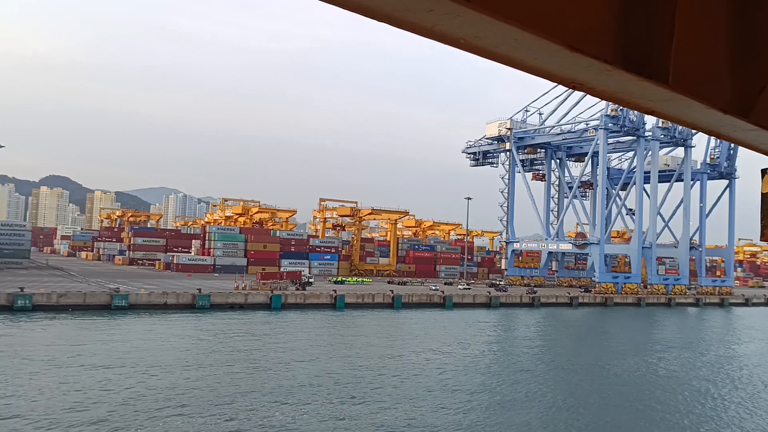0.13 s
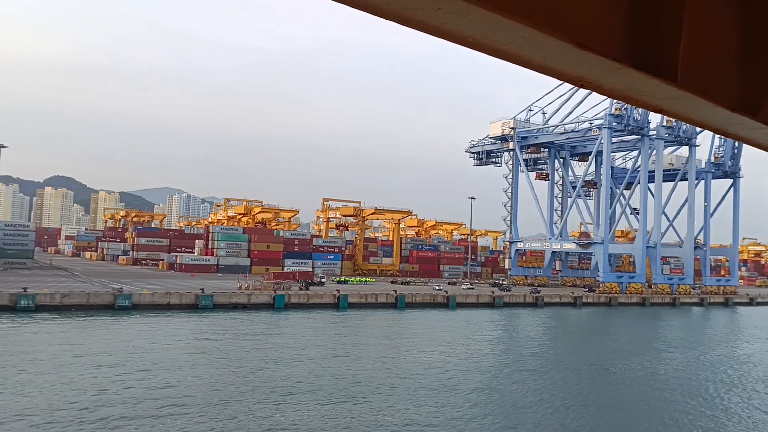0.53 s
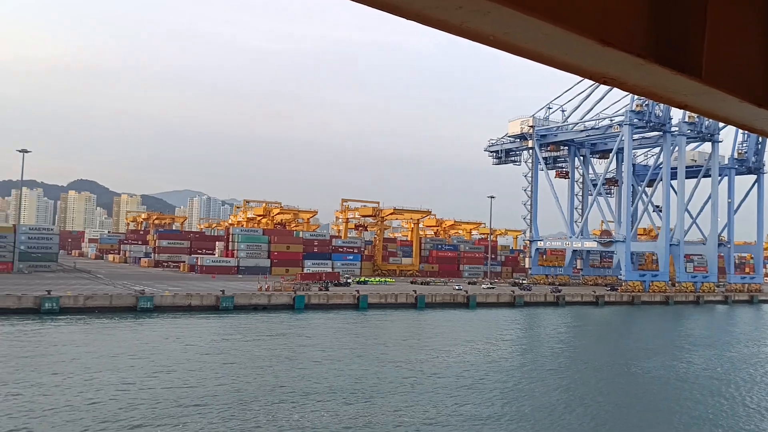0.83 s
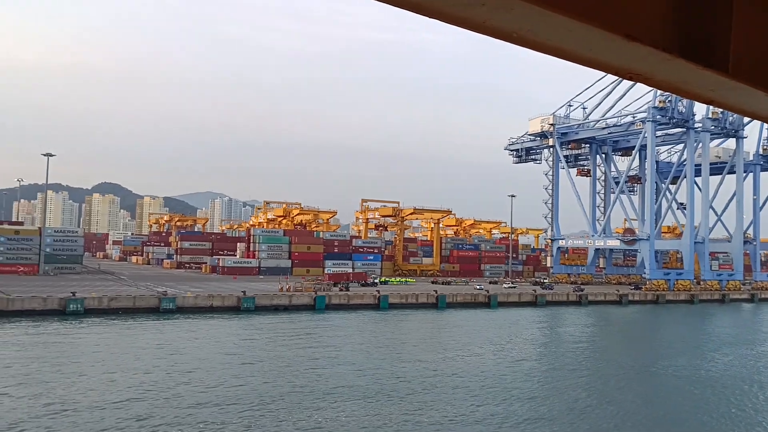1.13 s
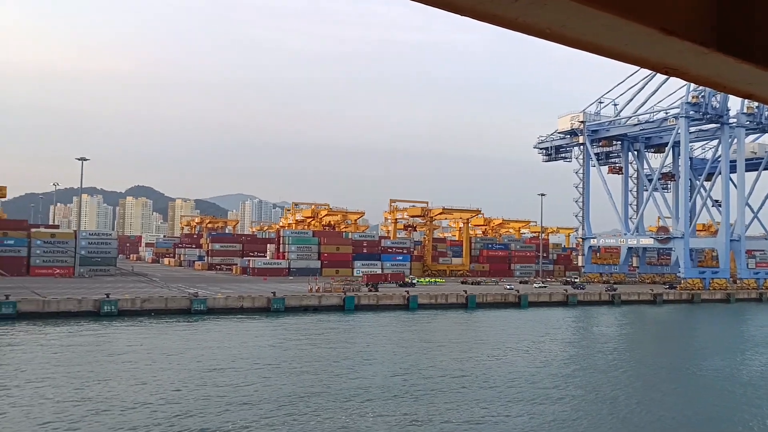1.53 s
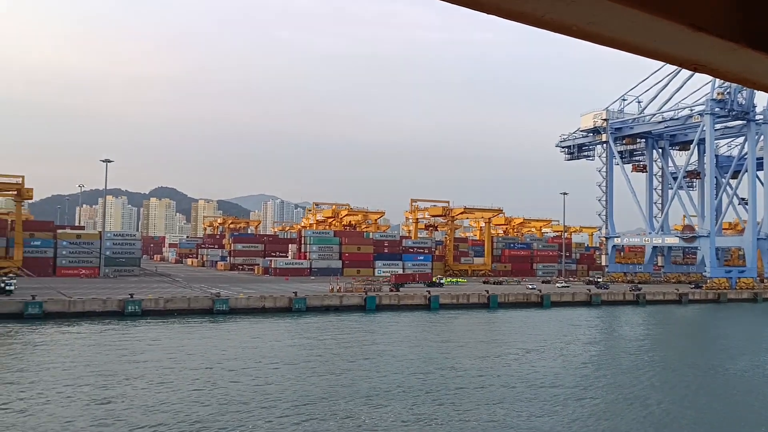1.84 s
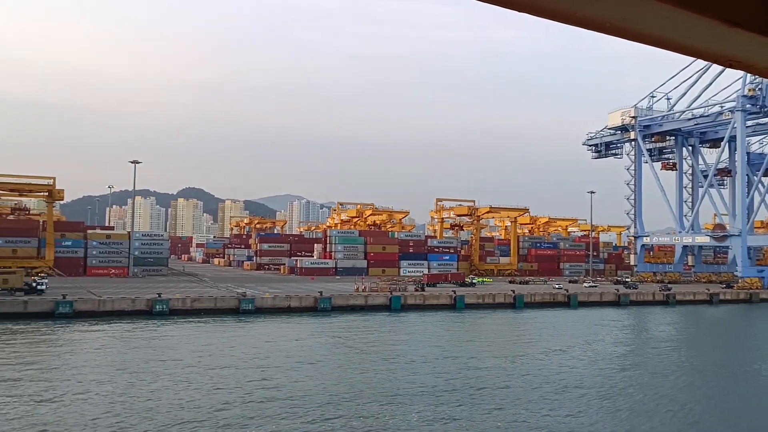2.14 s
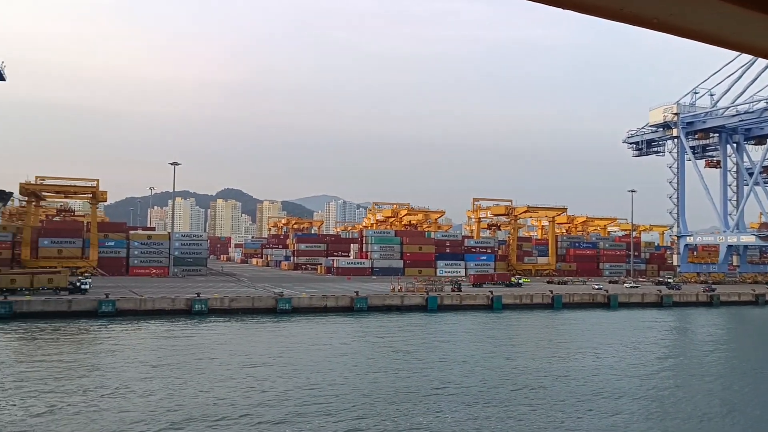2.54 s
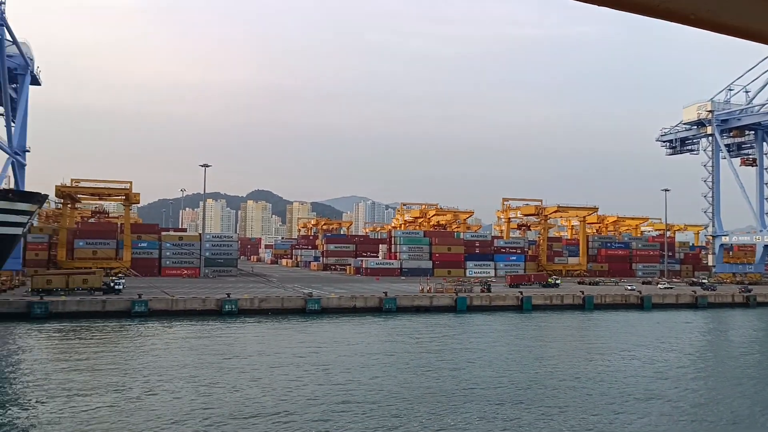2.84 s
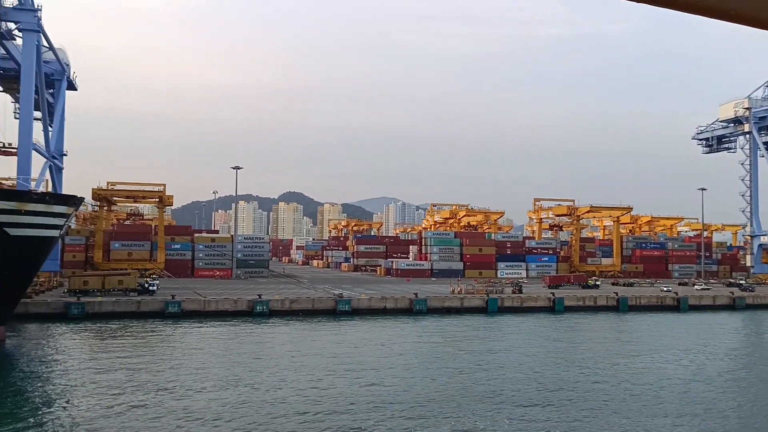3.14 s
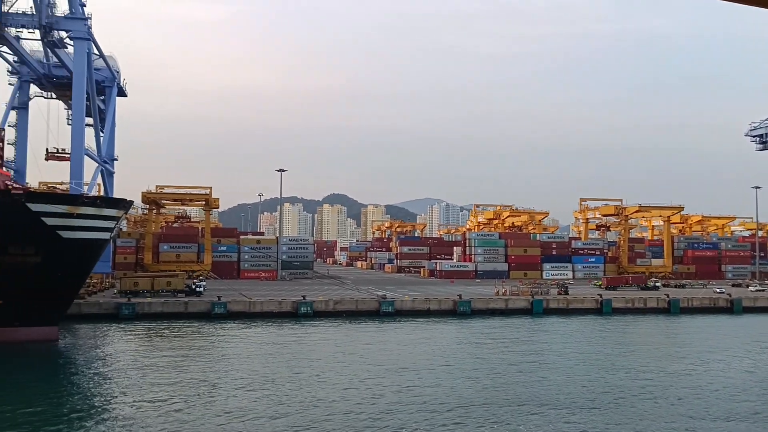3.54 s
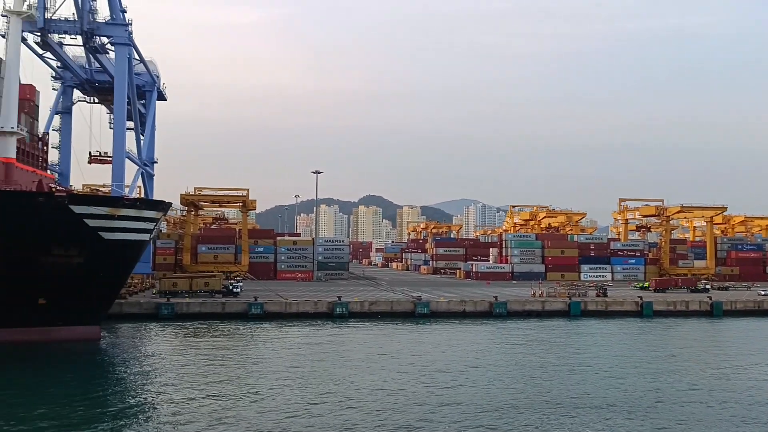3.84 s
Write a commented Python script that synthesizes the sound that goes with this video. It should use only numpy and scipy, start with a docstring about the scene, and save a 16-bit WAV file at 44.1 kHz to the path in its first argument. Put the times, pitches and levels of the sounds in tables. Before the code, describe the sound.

A ship's diesel engine fades in over the first half second and throbs low and steady until the end at 4 seconds, heard on deck. Ventilation rushes throughout, with thin fan tones, a narrow hiss and a faint, very high electrical tone. A blower whine swells and fades between the ears, strongest around 1.7 and 3.8 seconds. Two very soft ticks sound nearby at about 1 and 2.5 seconds.

```python
"""A ship's six-cylinder diesel engine throbs through the steelwork, heard on the open deck in harbour.
Its cylinders fire with uneven strength, which makes the throb. Ventilation rushes, with thin fan tones
and a narrow hiss. A blower's whine swells and fades at each ear as the listener turns through its
standing waves (loud and quiet spots in the air). An inverter sings faintly, very high, and two soft
ticks sound close by. Everything fades in at the start."""
import sys
import numpy as np
from scipy import signal
from scipy.fft import rfft, irfft
from scipy.io import wavfile

SR = 44100
rng = np.random.default_rng(int(sys.argv[2]) if len(sys.argv) > 2 else 0)


def transcribe(u):
    """Save the signal u as a 16-bit wav file named by the first command-line argument.

    u: samples, shape (n,) or (channels, n), limited to [-1, 1]; the rate is SR.
    q: integer samples, one column per channel.
    """
    v = np.clip(np.atleast_2d(u).T, -1, 1)
    q = np.round(v * 32767).astype(np.int16)
    wavfile.write(sys.argv[1], SR, q)


N = 176400
T = np.arange(N) / SR

# rush of air and exhaust: (pitch [Hz], left level [dB per Hz], right level [dB per Hz])
RUSH_SPECTRUM = [(25, -84, -84), (54.3, -75, -74.5), (77, -61, -58.5), (115, -53, -53.5), (200, -50, -50),
                 (308, -55, -54), (412, -56.5, -56.5), (560, -62, -62), (690, -59.5, -60),
                 (1050, -64.5, -63), (1540, -69, -65.5), (2050, -70, -64.5), (2580, -72.5, -64),
                 (3050, -77, -70), (3890, -77.5, -77.5), (4720, -84, -88), (6400, -92.5, -90.5),
                 (8000, -92.5, -100), (9100, -100, -107), (11100, -109, -112), (15000, -112, -113)]
# how alike the rush is at the two ears: (pitch [Hz], likeness [-1 to 1])
RUSH_LIKENESS = [(60, 0.93), (170, 0.97), (280, 0.93), (450, 0.88), (740, 0.58), (1220, 0.17),
                 (2000, 0.042), (3300, 0.16), (15000, 0.042)]
# swell of the narrow hiss: (time [s], level [dB])
HISS_LEVELS = [(.4, -57.5), (.7, -58.5), (.95, -54), (1.3, -53), (1.65, -55.5), (2.05, -51.5),
               (2.45, -50.5), (2.9, -55.5), (3.2, -53), (3.6, -53.5), (4, -55.5)]
# faint ticks close by: (time [s], level [dB])
TICK_EVENTS = [(1.013, -55), (2.519, -58)]
# inverter switching tones: (pitch [Hz], left level [dB], right level [dB], pitch wander [Hz])
INVERTER_PITCHES = [(9680, -77, -84, 1), (9958, -82, -87, 1), (10000, -76, -81, 1), (10042, -78, -85, 1),
                    (10320, -77, -83, 1), (10362, -86, -89, 1)]
# fan and motor tones: (pitch [Hz], left level [dB], right level [dB], pitch wander [Hz])
FAN_PITCHES = [(826, -51.5, -51.5, 3), (921.5, -43, -43, .7), (935, -51, -51, 16), (1374, -50, -49, 7),
               (1656, -60, -51.5, 1.2), (2469, -60, -53, 13), (2787, -63, -66, 1.5), (8059, -76, -85, 6)]
# blower whine: (time [s], left level [dB], right level [dB], left ear's head start [ms])
WHINE_AT_EARS = [(0.3, -45, -46, 0.05), (0.4, -35, -36, 0.05), (0.56, -32, -29, 0.01),
                 (0.76, -39, -37, 0.27), (0.86, -30, -28, 0.18), (0.99, -30, -30, 0.17),
                 (1.12, -44, -30.5, 0.3), (1.2, -51, -44, 0.19), (1.36, -44, -45, 0.48),
                 (1.43, -31, -31, 0.56), (1.6, -29, -35, 0.55), (1.69, -26.5, -21.5, 0.65),
                 (1.84, -33, -25, 0.63), (2.02, -30, -35, 0.58), (2.12, -28, -31, 0.33),
                 (2.24, -39, -36, 0.24), (2.5, -31, -37, 0.45), (2.65, -36, -41, 0.42),
                 (2.75, -38, -26.5, 0.44), (2.92, -38, -35, 0.25), (3.09, -38, -27.5, 0.3),
                 (3.15, -45, -45, 0.4), (3.37, -43, -43, 0.35), (3.56, -42, -27, 0.45),
                 (3.68, -33, -26, 0.75), (3.8, -33, -23.5, 0.86), (3.98, -31, -26.5, 0.86)]
# the six firings of one four-stroke engine cycle, in order: (strength [dB])
FIRING_STRENGTHS = [-3.8, -5.6, -10, -1, -.5, -2.2]
# engine hum: (harmonic [multiple of the cycle rate], level [dB])
ENGINE_HARMONICS = [(6, -46), (11, -57), (12, -53.5), (13, -51), (14, -44), (15, -45), (16, -52), (17, -46),
                    (18, -32.5), (19, -45), (20, -38), (21, -50), (22, -55), (23, -32.5), (24, -28.5),
                    (25, -32), (26, -32.5), (27, -36.5), (28, -49), (29, -36), (30, -40), (31, -51),
                    (32, -40), (33, -42), (34, -52), (35, -43), (36, -34), (37, -46), (38, -47), (39, -46),
                    (40, -42), (41, -54), (42, -46.5), (43, -49), (44, -43.5), (45, -48.5), (46, -48.5)]
# ringing of the steelwork, which delays each firing and draws it out: (pitch [Hz], width [Hz])
HULL_RESONANCES = [(149, 24), (225, 80)]
# opening fade, applied to the whole sound: (time [s], gain [dB])
FADE_IN = [(.09, -81), (.105, -52), (.122, -30), (.2, -20.5), (.3, -13), (.38, -6.5), (.5, -3)]


def from_db(db):
    """Turn decibels into a gain to multiply by."""
    return 10 ** (np.asarray(db) / 20)


def unit_level(x):
    """Scale a signal so its average power is 1."""
    return x / np.sqrt(np.mean(x ** 2) + 1e-20)


def over_time(rows):
    """Join a table's time points with straight lines: one curve per value column."""
    times, *columns = np.transpose(rows)
    return [np.interp(T, times, c) for c in columns]


def over_pitch(rows, hz):
    """Read a table's value columns at the pitches hz, with octaves evenly spaced."""
    points, *columns = np.transpose(rows)
    return np.array([np.interp(np.log(hz + 1e-9), np.log(points), c) for c in columns])


def drift(rate_hz):
    """A smooth random wobble with a typical size of 1."""
    pole = np.exp(-200 * np.pi * rate_hz / SR)
    noise = rng.standard_normal(N // 100 + 1002)  # one value per 100 samples, plus a run-up
    slow = signal.lfilter([1], [1, -2 * pole, pole * pole], noise)[1000:]
    return np.interp(np.arange(N) / 100, np.arange(len(slow)), unit_level(slow))


def pan(left_db):
    """Gains that raise the left ear and lower the right."""
    return from_db([[left_db], [-left_db]])


def wandering_phase(hz, wander_hz):
    """The growing angle of a tone whose pitch is not quite steady."""
    return 2 * np.pi * np.cumsum(hz + wander_hz * drift(6.02)) / SR


def air_rush(flicker_db=.5):
    """Broad noise of ventilation and exhaust: alike at both ears in the bass, unlike in the treble."""
    hz = np.arange(N // 2 + 1) * SR / N
    shared, opposite = rfft(rng.standard_normal((2, N)))
    alike = np.clip(over_pitch(RUSH_LIKENESS, hz), -1, 1)
    ears = np.sqrt(1 + alike) * shared + np.sqrt(1 - alike) * opposite * [[1], [-1]]
    air = irfft(ears * from_db(over_pitch(RUSH_SPECTRUM, hz)), N) * np.sqrt(SR) / 2
    return air * from_db(flicker_db * drift(9.1))


def air_hiss(hz=5455, width_hz=250, flicker_db=1.7):
    """A narrow band of air noise, gently surging."""
    band = signal.butter(2, [hz - width_hz / 2, hz + width_hz / 2], "band", fs=SR, output="sos")
    air = unit_level(signal.sosfilt(band, rng.standard_normal((2, N))))
    return air * from_db(over_time(HISS_LEVELS)[0] + flicker_db * drift(7)) * pan(left_db=2.3)


def ticks(decay_s=.048, low_cut_hz=6500):
    """Short, bright bursts of noise that die away."""
    level = sum(from_db(db) * (T >= s) * np.exp(-np.abs(T - s) / decay_s) for s, db in TICK_EVENTS)
    bright = signal.butter(2, low_cut_hz, "high", fs=SR, output="sos")
    return signal.sosfilt(bright, level * rng.standard_normal((2, N)) + 1e-18) * pan(left_db=2.6)


def machine_tones(rows, flicker_db, blur_rad, flicker_hz):
    """Thin tones of fans or an inverter; reflections make each flicker and shift between the ears."""
    ears = np.zeros((2, N))
    for hz, left_db, right_db, wander_hz in rows:
        phase = wandering_phase(hz, wander_hz)
        for ear, db in zip(ears, (left_db, right_db)):
            level = from_db(db + flicker_db * drift(flicker_hz))
            ear += np.sqrt(2) * level * np.sin(phase + blur_rad * drift(flicker_hz))
    return ears


def blower_whine(hz=1893, flicker_db=2.5, octave_db=-32):
    """Spinning blades make a tone and its faint octave; each ear gets its own level and delay."""
    left_db, right_db, lead_ms = over_time(WHINE_AT_EARS)
    phase = wandering_phase(hz, wander_hz=.78)
    half_lead = np.pi * hz * lead_ms / 1000
    ears = []
    for db, angle in (left_db, phase + half_lead), (right_db, phase - half_lead):
        tone = np.sin(angle) + from_db(octave_db) * np.sin(2 * angle)
        ears.append(from_db(db + flicker_db * drift(11.5)) * tone)
    return np.sqrt(2) * np.array(ears)


def diesel_engine(cycle_hz=5.984, first_firing_s=.0196, flutter=.084, flutter_hz=2.8, wander_s=.00008):
    """A stack of tones takes its timing from the uneven firings, so the bass throbs once a cycle."""
    harmonics, levels_db = np.transpose(ENGINE_HARMONICS)
    # above the table, a drone that falls 10.5 dB per octave
    upper = np.arange(round(harmonics[-1]) + 1, 120)
    drone_db = -47.5 - 10.5 * np.log2(upper / upper[0]) + rng.normal(0, 2, len(upper))
    harmonics = np.r_[np.round(harmonics), upper]
    gains = np.sqrt(2) * from_db(np.r_[levels_db, drone_db])
    hz = harmonics * cycle_hz
    cylinders = len(FIRING_STRENGTHS)
    firings_s = first_firing_s + np.arange(cylinders) / cylinders / cycle_hz
    phase = np.angle(np.exp(-2j * np.pi * np.outer(hz, firings_s)) @ from_db(FIRING_STRENGTHS))
    phase -= sum(2 * np.arctan(2 * (hz - ring_hz) / width_hz) for ring_hz, width_hz in HULL_RESONANCES)
    # above 215 Hz, the many paths through the hull smear the firings
    phase += .62 * (hz / 215) ** 4 * rng.standard_normal(len(hz))
    ear_shift = hz / 740 * rng.standard_normal(len(hz)) / 2  # ears about a radian apart at 740 Hz
    # build one cycle for each ear, then loop it at a slightly unsteady speed
    cycle = np.linspace(0, 1, 4096)
    angles = 2 * np.pi * np.outer(harmonics, cycle)
    waves = [gains @ np.cos(angles + ear[:, None]) for ear in (phase + ear_shift, phase - ear_shift)]
    position = (T + wander_s * drift(flutter_hz)) * cycle_hz % 1
    hum = np.array([np.interp(position, cycle, wave) for wave in waves])
    return hum * (1 + flutter * drift(flutter_hz))


def scene():
    """All the machinery together, as heard on deck."""
    fans = machine_tones(FAN_PITCHES, flicker_db=2.4, blur_rad=.4, flicker_hz=8)
    inverter = machine_tones(INVERTER_PITCHES, flicker_db=2.2, blur_rad=.7, flicker_hz=7)
    return diesel_engine() + air_rush() + blower_whine() + fans + inverter + air_hiss() + ticks()


def record(dry):
    """Fade the sound in and cut the treble above 15750 Hz."""
    faded = dry * from_db(over_time(FADE_IN)[0])
    return signal.sosfilt(signal.ellip(12, .1, 80, 15750, fs=SR, output="sos"), faded)


dry = scene()
out = record(dry)
transcribe(out)
```